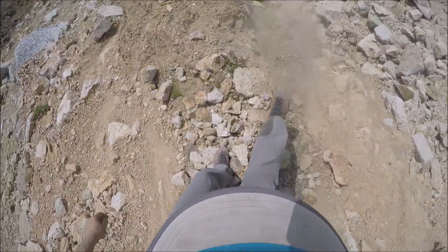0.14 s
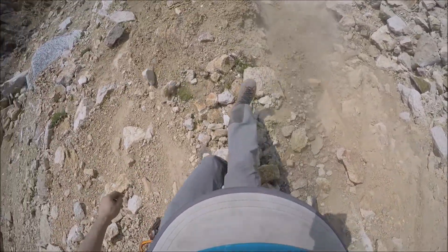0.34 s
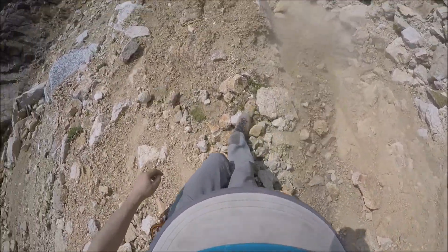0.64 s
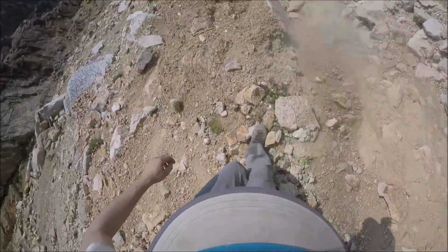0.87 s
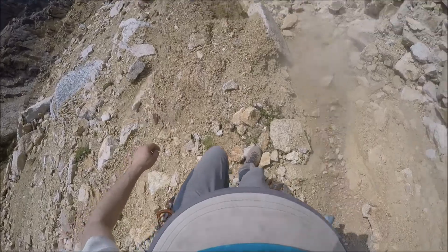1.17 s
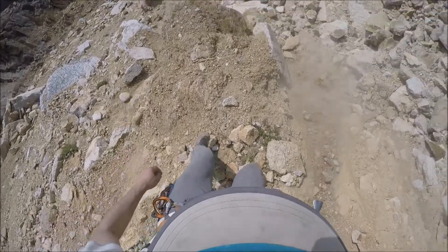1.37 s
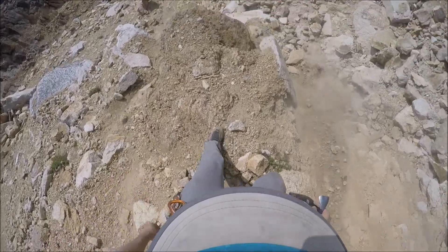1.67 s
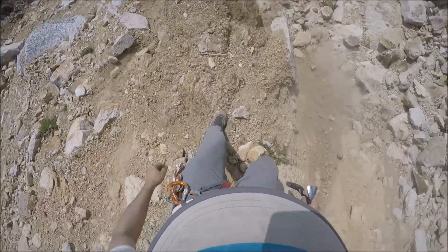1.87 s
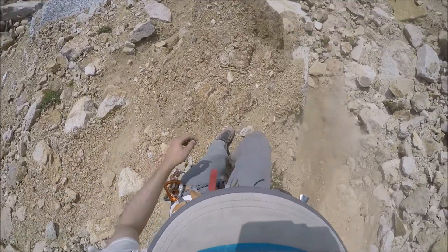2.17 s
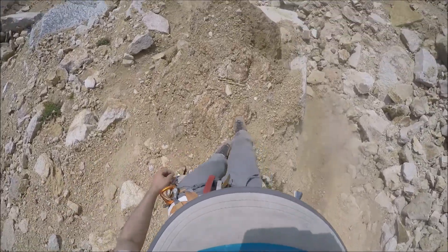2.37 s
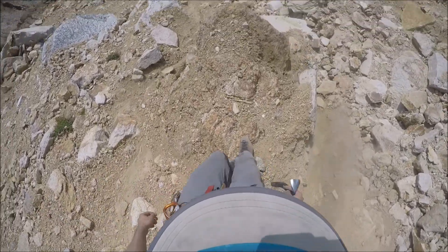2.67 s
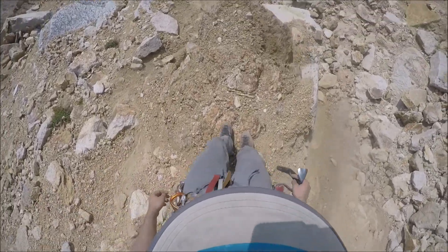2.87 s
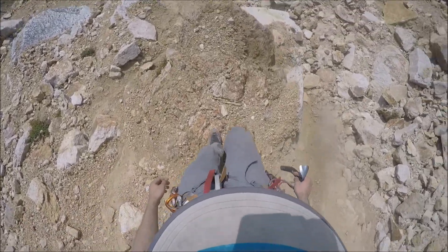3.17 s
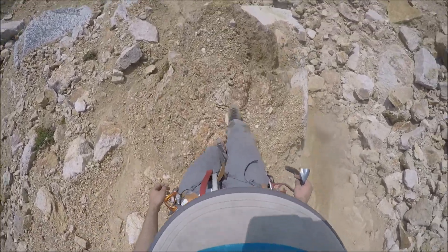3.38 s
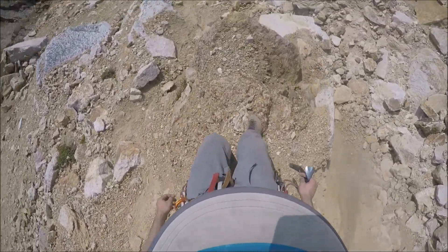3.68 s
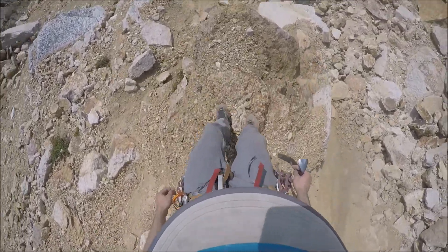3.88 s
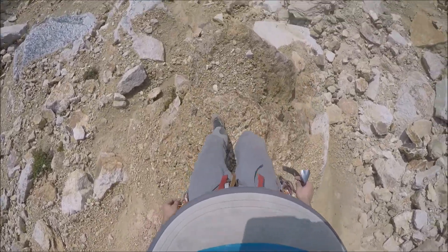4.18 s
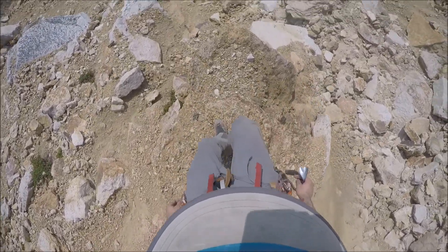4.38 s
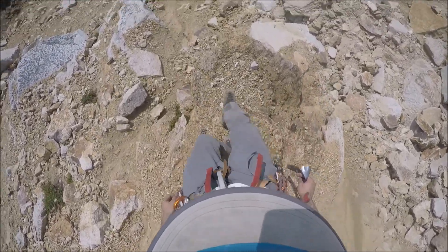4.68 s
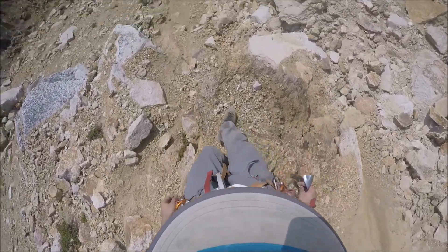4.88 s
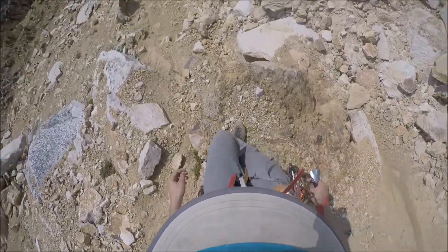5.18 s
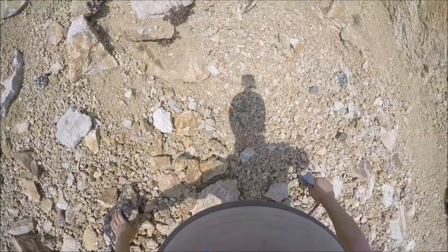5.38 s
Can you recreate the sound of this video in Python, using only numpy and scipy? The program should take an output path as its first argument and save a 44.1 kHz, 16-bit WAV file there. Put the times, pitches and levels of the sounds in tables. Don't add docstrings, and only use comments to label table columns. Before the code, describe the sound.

Outdoors on a dry slope of loose stones, heard from a body-worn camera in a closed case. A dense clatter of pebbles and hissing gravel opens loudly, thins over two seconds, and fades to sparse ticks and a distant trickle. Boot knocks, deep jolts and wind rumble keep bumping the housing. At the very end the hiss drops for a quieter spot.

```python
import sys
import numpy as np
from scipy import signal
from scipy.fft import rfft, irfft
from scipy.io import wavfile
from scipy.ndimage import uniform_filter1d

SR = 44100
rng = np.random.default_rng(int(sys.argv[2]) if len(sys.argv) > 2 else 0)


def output_pcm(signal):
    pcm = np.clip(np.atleast_2d(signal).T, -1, 1) * 32767
    wavfile.write(sys.argv[1], SR, np.round(pcm).astype(np.int16))


def gain_from_decibels(decibels):
    exponent = np.asarray(decibels, float) / 20
    return 10 ** exponent


N = 244302


def rms_one(x):
    return x / np.sqrt(np.mean(x ** 2) + 1e-20)


def in_time(rows):
    s, level = np.transpose(rows)
    return np.interp(np.arange(N) / SR, s, level)


def at_hz(points, hz):
    table_hz, db = np.transpose(points)
    return np.interp(np.log(hz), np.log(table_hz), db)


def drift(rate_hz):
    r = np.exp(-40 * np.pi * rate_hz / SR)
    noise = rng.standard_normal(N // 20 + 2002)
    slow = signal.lfilter([1], [1, -2 * r, r * r], noise)[2000:]
    return np.interp(np.arange(N) / 20, np.arange(len(slow)), rms_one(slow))


def coloured(spectrum):
    hz = np.maximum(np.arange(N // 2 + 1) * SR / N, 1)
    return rms_one(irfft(rfft(rng.standard_normal(N)) * gain_from_decibels(at_hz(spectrum, hz)), N))


def resonate(x, hz, r):
    section = [1, 0, -1, 1, -2 * r * np.cos(2 * np.pi * hz / SR), r * r]
    return signal.sosfilt([section, section], x)


def grains(spectrum, per_s, spread_db, cycles, clump_db, clump_rate, count=20):
    sizes = gain_from_decibels(spread_db * np.minimum(rng.exponential(1, N), 4)) * rng.choice([-1, 1], N)
    born = rng.random(N) < per_s * gain_from_decibels(clump_db * drift(clump_rate)) / SR
    dealt = rng.integers(0, count, N)
    out = np.zeros(N)
    top_hz = min(spectrum[-1][0], 0.36 * SR)
    for k, hz in enumerate(np.geomspace(spectrum[0][0], top_hz, count)):
        clicks = sizes * born * (dealt == k) + 1e-18
        ring = resonate(clicks, hz, gain_from_decibels(-60 * hz / (cycles * SR)))
        out += rms_one(ring) * gain_from_decibels(at_hz(spectrum, hz)) * np.sqrt(hz)
    return rms_one(out)


def swells(rows, rise_db_per_s, rest_db):
    t = np.arange(0, N + 32, 32) / SR
    power = np.zeros(len(t))
    for s, db, fade in rows:
        away_db = np.where(t < s, rise_db_per_s * (s - t), abs(fade) * (t - s))
        power += gain_from_decibels(2 * (db - away_db))
    return 10 * np.log10(np.interp(np.arange(N) / SR, t, power) + gain_from_decibels(2 * rest_db))


def lay(out, start_s, burst):
    at = round(start_s * SR)
    out[at:at + len(burst)] += burst


def quiet_spot():
    start_s, level_db = 5.414, -9
    return gain_from_decibels(level_db * (np.arange(N) / SR > start_s))


# (pitch_hz, level_db per Hz)
DUST = [(180, -45), (300, -5), (1020, -6.5), (1610, -10.5), (2970, 1), (4720, -13), (5210, 3),
        (5850, -12.5), (6670, -1.5), (12300, -20), (15500, -18)]
# (pitch_hz, level_db per Hz)
SPARKS = [(6700, -10), (9500, -4), (15500, 8)]


def fine_dust(gravel_db):
    sparks = grains(SPARKS, per_s=1500, spread_db=5.5, cycles=9.7, clump_db=0.0, clump_rate=22, count=8)
    dust_level = gain_from_decibels(-54.5 + 0.7 * (gravel_db + 43.5))
    still_air = gain_from_decibels(-64)
    hiss = (dust_level + still_air) * gain_from_decibels(1.36 * drift(28)) * coloured(DUST)
    return hiss + gain_from_decibels(gravel_db - 23.0) * sparks


# (time_s, level_db)
SLIDE = [(0.0, -44.5), (0.25, -41.5), (0.63, -45), (1.3, -47.5), (1.48, -47), (1.67, -47), (2.05, -52),
         (2.29, -51.5), (2.42, -54), (3.91, -62), (4.68, -60), (5.24, -65.5), (5.3, -61.5)]
# (pitch_hz, level_db per Hz)
GRAVEL = [(590, -50), (1000, -1.5), (1530, -24), (1690, 3.5), (2340, 1.5), (2740, -2), (3740, 0.5),
          (6400, -9.5), (7690, -36), (10700, -52), (15500, -54)]
# (pitch_hz, level_db per Hz)
COARSE = [(250, 16.5), (500, -7.5), (900, 6.5), (1400, 0.5), (2200, -35)]
# (middle_s, level_db, length_s, fine_share from 0 to 1)
SCRAPES = [
    (0.0069, -50, 0.0049, .1),
    (3.685, -60, 0.026, 0.68),
    (4.16, -57, 0.017, 0.27),
    (4.341, -54, 0.0067, 0.091),
    (4.985, -60, 0.017, 0.6),
    (5.03, -60, 0.04, 0.65),
    (2.635, -59, 0.013, 0.9),
    (2.25, -59, 0.0087, 0.9),
    (1.81, -54.5, 0.025, 0.97),
]
# (start_s, level_db, fade_db_per_s)
ROLLS = [
    (0.0, -54, -2),
    (.43, -55, 11),
    (1.6, -50.5, 11.5),
    (2.38, -61, 62),
    (3.05, -55, 58.5),
    (3.73, -56, 130.5),
    (5.2, -61.5, 9),
    (5.4, -66, 22),
]


def running_gravel():
    t, gravel_db = np.arange(N) / SR, in_time(SLIDE)
    gravel = grains(GRAVEL, per_s=3500, spread_db=4.2, cycles=4.5, clump_db=2.6, clump_rate=70)
    ticks = grains(GRAVEL[1:-3], per_s=700, spread_db=2.0, cycles=3.5, clump_db=4.5, clump_rate=45, count=12)
    ticks_db = -1.0 + 0.23 * (gravel_db + 43)
    coarse = grains(COARSE, per_s=1500, spread_db=3.0, cycles=3.04, clump_db=3.5, clump_rate=25, count=10)
    scrape, fine_scrape = np.zeros(N), np.zeros(N)
    for s, db, length_s, fine_share in SCRAPES:
        stroke = gain_from_decibels(db) * np.exp(-((t - s) / length_s) ** 2)
        scrape += stroke
        fine_scrape += fine_share * stroke
    rolling = gain_from_decibels(swells(ROLLS, rise_db_per_s=43, rest_db=-82) - 5) + scrape
    sliding = gain_from_decibels(gravel_db - 4) * (gravel + gain_from_decibels(ticks_db) * ticks) + fine_scrape * gravel
    return quiet_spot() * (sliding + fine_dust(gravel_db)) + rolling * coarse


# (time_s, level_db)
WIND = [(0.0, -54), (0.43, -55), (0.66, -50), (0.77, -53), (1.76, -47.5), (2.02, -55.5), (2.75, -57.5),
        (3.1, -47.5), (3.33, -52), (3.61, -54), (3.76, -62), (4.21, -51), (4.52, -60.5), (4.64, -51),
        (4.91, -52.5), (5.18, -48), (5.48, -58.5), (5.54, -59)]
# (start_s, level_db, fade_db_per_s)
PUSHES = [(.03, -37.5, 40), (.43, -33, 48), (.71, -35, 5.5), (1.39, -41, 62), (1.53, -40, 49),
          (1.74, -23, 150), (1.87, -25.5, 248), (2.0, -38, 58), (2.31, -41, 22), (2.56, -33.5, 199),
          (2.71, -35.5, 116), (2.87, -37.5, 77), (3.1, -29, 48), (3.5, -37, 52), (3.69, -27, 130),
          (3.78, -35, 112), (3.95, -40.5, 90), (4.24, -36, 60), (4.35, -26, 162), (4.6, -38.5, 24),
          (4.81, -36, 77), (5.0, -28.5, 110), (5.18, -31.5, 250), (5.29, -37.5, 300), (5.4, -37, 202)]
# (pitch_hz, level_db per Hz)
RUMBLE = [(7.1, -66), (12, 8), (27, 1.5), (57, -1.5), (71, -5), (130, -25.5), (170, -53), (290, -120)]
# (pitch_hz, level_db per Hz)
UPPER_RUMBLE = [(70, 1), (110, 1.5), (160, -3.5), (250, -12), (500, -22), (900, -36.5), (3000, -60)]


def rumble():
    low = coloured(RUMBLE)
    low = rms_one(low / uniform_filter1d(low ** 2, size=2600) ** 0.8)
    wind_db = in_time(WIND)
    sway_db = -44 + 0.17 * (wind_db + 48)
    shake_db = swells(PUSHES, rise_db_per_s=177, rest_db=sway_db)
    upper_db = wind_db + 3.0 + 2.07 * drift(20.6)
    return gain_from_decibels(shake_db + 1.0) * low + gain_from_decibels(upper_db) * coloured(UPPER_RUMBLE)


def microphone_hiss():
    return gain_from_decibels(-67.5) * quiet_spot() * rng.standard_normal(N)


def clacks(hits):
    out, t = np.zeros(N + 2048), np.arange(2048) / SR
    contact = 1 - np.exp(-(t / 0.00037) ** 2)
    for s, db, hz, body_db, edge_db, t60_s in hits:
        noise = rng.standard_normal(2048)
        above, below = 1.0 + 0.358 * rng.random(), 0.55 + 0.309 * rng.random()
        dying = -60 * t / t60_s
        ring = np.sin(2 * np.pi * hz * t) * gain_from_decibels(dying)
        ring += 0.22 * np.sin(2 * np.pi * hz * above * t) * gain_from_decibels(0.6 * dying)
        ring += 0.35 * np.sin(2 * np.pi * hz * below * t) * gain_from_decibels(0.62 * dying)
        crunch = 0.65 * rms_one(resonate(noise, 1.05 * hz, 0.82)) * gain_from_decibels(0.75 * dying)
        body = rms_one(resonate(noise, 460, 0.873)) * gain_from_decibels(body_db - 2.5 - 60 * t / 0.074)
        edge = rms_one(resonate(noise, 4670, 0.61)) * gain_from_decibels(edge_db + 13.5 - 60 * t / 0.014)
        lay(out, s, gain_from_decibels(db - 4.5) * contact * (ring + crunch + body + edge))
    return out[:N]


def patter(rows, gain_db, t60_s, r):
    out, t = np.zeros(N + 1024), np.arange(1024) / SR
    shape = (1 - np.exp(-(t / 0.00055) ** 2)) * gain_from_decibels(gain_db - 60 * t / t60_s)
    for s, db, hz in rows:
        breath = rms_one(resonate(rng.standard_normal(1024), hz, r))
        lay(out, s, gain_from_decibels(db) * shape * (np.sin(2 * np.pi * hz * t) + 0.85 * breath))
    return out[:N]


# (start_s, peak_db, pitch_hz, body_db against the peak)
THUMPS = [(.005, -26.5, 1190, -23), (0.223, -31.5, 1000, -12), (0.1259, -32, 1820, -3),
          (.5127, -39, 2360, 2.5), (0.5708, -38, 2420, 2), (.6529, -38.5, 2330, 1),
          (0.9715, -29.5, 2360, -15), (1.024, -31, 2400, -8.5), (1.3304, -29.5, 2360, -3),
          (1.5578, -36, 2420, 1.5), (1.8486, -24, 1160, -15), (1.9969, -42.5, 3380, 1.5),
          (2.0045, -34.5, 2640, -5.5), (2.0522, -36, 920, -13), (2.0812, -35, 1098, -8),
          (2.2134, -25, 1075, -10.5), (2.4019, -32, 1133, -4), (2.4255, -26.5, 2270, -8),
          (2.6736, -42, 910, -13), (2.7277, -36, 2530, -5), (2.8628, -41, 1180, 0.5),
          (3.161, -36, 1030, -20), (3.2096, -44.5, 2530, 1.5), (3.88, -38.5, 2660, -9),
          (5.5242, -46, 2370, -2.5)]


def thumps():
    return clacks([(s, db, hz, body_db, -17, 0.02) for s, db, hz, body_db in THUMPS])


# (start_s, peak_db, pitch_hz)
PEBBLES = [(0.025, -30, 2360), (0.1186, -22, 2340), (0.1424, -24.5, 2360), (0.1964, -25.5, 2310),
           (0.2584, -31, 3620), (0.4654, -34, 2870), (0.6794, -29, 2360), (0.836, -36, 2360),
           (0.986, -34, 2390), (1.1074, -33, 2280), (1.2454, -36, 3820), (1.304, -34, 3400),
           (1.4364, -32, 2540), (1.5704, -34.5, 2330), (1.7204, -32, 2320), (1.8492, -25, 2480),
           (1.9604, -36.5, 2380), (2.1366, -29.5, 3740), (2.1494, -39, 1810), (2.2544, -35, 2350),
           (2.3354, -36, 2200), (2.5052, -43, 3130), (2.6164, -40, 3130), (2.636, -40, 2380),
           (2.7277, -36, 3260), (2.7324, -36, 2380), (2.8524, -38.5, 2370), (2.8623, -32, 1800),
           (2.9183, -41, 2560), (3.1667, -37, 2530), (3.1934, -46, 2550), (3.3677, -47.5, 2370),
           (3.3797, -45, 2680), (3.3874, -45, 1850), (3.4004, -41, 3630), (3.4171, -42, 2840),
           (3.4484, -46, 2330), (3.48, -42, 3770), (3.692, -44, 1990), (3.7914, -45, 2920),
           (4.2744, -42, 2720), (4.2864, -49, 3000), (4.3584, -48, 2770), (4.513, -44, 2960),
           (4.6084, -42, 3000), (4.6234, -42, 3340), (4.6503, -46, 2580), (4.8005, -44, 2840),
           (4.8424, -48.5, 3750), (5.3642, -48, 2230)]


def pebbles():
    return patter(PEBBLES, gain_db=-6.5, t60_s=0.017, r=0.83)


# (start_s, peak_db, pitch_hz, t60_s to fade by 60 dB)
RINGS = [(.0318, -35, 3680, 0.074), (0.1248, -22, 2330, 0.043), (.1805, -36.5, 1195, 0.04),
         (0.1849, -35.5, 2360, 0.06), (0.3139, -20.5, 2360, 0.019), (.3466, -37.5, 3600, 0.046),
         (0.356, -33, 2264, 0.1), (0.427, -31, 2370, 0.017), (0.5304, -27.5, 2250, .018),
         (0.7856, -35.5, 1220, 0.032), (0.794, -35, 2370, 0.014), (0.8493, -27, 1680, .02),
         (1.0593, -27.5, 3600, 0.013), (1.095, -29, 3750, 0.03), (1.2102, -35, 1076, 0.044),
         (1.208, -38.5, 900, 0.045), (1.3625, -22.5, 2260, 0.014), (1.4221, -22, 2580, 0.015),
         (1.727, -25.5, 3050, 0.013), (2.1326, -31, 1944, 0.035), (2.142, -34, 1735, 0.054),
         (2.2684, -27, 2360, 0.0091), (2.2724, -26.5, 1803, 0.039), (2.2824, -28, 2340, 0.016),
         (2.4586, -39.5, 3172, 0.028), (2.7577, -30.5, 2300, 0.022), (4.4684, -46, 2960, 0.044),
         (4.7346, -40, 2930, 0.025), (4.7727, -36, 2930, 0.02)]


def rings():
    return clacks([(s, db, hz, -37, -24, t60_s) for s, db, hz, t60_s in RINGS])


# (start_s, peak_db, pitch_hz)
GRIT = [(0.0474, -40, 4860), (0.1092, -30, 5410), (0.2084, -34, 4730), (0.2309, -37, 5740),
        (0.2428, -35, 4960), (0.2584, -34, 4930), (0.2644, -34, 4520), (0.2982, -36, 5020),
        (0.3994, -35, 4500), (0.6719, -35, 4920), (0.8649, -40, 5080), (0.9273, -35, 5730),
        (0.9464, -41, 4520), (1.1054, -36, 5760), (1.1124, -34, 5030), (1.1468, -39, 5140),
        (1.1604, -40, 5500), (1.2446, -39, 4500), (1.3444, -43.5, 5860), (1.3734, -44, 6340),
        (1.4631, -35, 6290), (1.5814, -39, 5770), (1.8254, -42.5, 6580), (1.8961, -36, 5730),
        (1.9594, -45.5, 5760), (2.3174, -38, 4950), (2.352, -41, 6090), (2.6224, -48, 6700),
        (2.8853, -50, 5350), (2.9417, -46, 5560), (2.9781, -50, 6700), (3.0334, -49, 5890),
        (3.0604, -49, 6600), (3.458, -40, 5030), (3.5009, -43, 5820), (4.3201, -53, 5460),
        (4.4493, -51, 6420), (4.593, -49, 6590), (4.6024, -48.5, 6540), (4.7217, -50, 4990),
        (4.9844, -55, 5340)]


def grit():
    return patter(GRIT, gain_db=0, t60_s=0.012, r=0.7)


# (start_s, peak_db, pitch_hz)
TICKS = [(0.216, -53, 9380), (0.2986, -41, 9130), (0.551, -45, 9960), (0.8104, -45, 9220),
         (1.1053, -45, 9920), (1.4221, -49, 9290), (1.5722, -47, 9030), (1.7114, -54, 9100),
         (1.9972, -49, 9100), (2.0978, -49, 8870), (2.3315, -52, 8940), (2.4392, -59, 9380),
         (2.7535, -51, 9000), (5.152, -45.5, 8170), (.110, -44, 9300), (1.1155, -43, 9300),
         (2.048, -51, 9300), (2.1205, -47, 9300), (2.1425, -51, 9300), (2.371, -52, 9300),
         (2.629, -54, 9300), (3.5055, -55, 9300), (3.945, -56, 9300), (4.319, -50, 9300),
         (4.335, -53, 9300), (4.682, -52, 9300)]


def ticks_close():
    out, t = np.zeros(N + 1024), np.arange(1024) / SR
    for s, db, hz in TICKS:
        burst = rms_one(resonate(rng.standard_normal(1024), 0.86 * hz, 0.53))
        lay(out, s, gain_from_decibels(db - 1.5 - 60 * t / 0.0097) * burst)
    return out[:N]


# (start_s, peak_db, pitch_hz, t60_s to fade by 60 dB)
KNOCKS = [(0.12, -13, 650, 0.011), (0.61, -37, 348, 0.018), (1.02, -24, 520, 0.0078),
          (1.338, -28.5, 380, 0.01), (1.847, -31, 584, 0.017), (2.05, -37, 453, 0.0097),
          (2.212, -27, 327, 0.019), (2.2115, -31, 790, 0.018), (2.4, -38, 400, 0.034),
          (2.85, -34.5, 470, 0.013), (3.148, -39, 310, 0.029), (4.1, -48, 283, 0.015),
          (4.345, -42, 270, 0.02), (4.344, -44, 690, 0.012), (1.008, -35, 1030, 0.018)]


def knocks():
    out, t = np.zeros(N + 4096), np.arange(4096) / SR
    onset = 1 - np.exp(-t / 0.00069)
    for s, db, hz, t60_s in KNOCKS:
        ring = np.sin(2 * np.pi * hz * t)
        ring += 0.28 * np.sin(2.8 * np.pi * hz * t)
        ring += 0.086 * np.sin(1.1 * np.pi * hz * t)
        lay(out, s + 0.0015, gain_from_decibels(db + 0.5 - 60 * t / t60_s) * onset * ring)
    return out[:N]


# (start_s, peak_db, pitch_hz)
CHIPS = [(.2309, -43, 3600), (0.551, -35, 3400), (0.7374, -47, 2380), (0.8735, -35, 2310),
         (.8999, -47, 2370), (1.1129, -32.5, 2360), (1.2346, -38.5, 3310), (1.2936, -28.5, 3200),
         (1.392, -34, 1530), (1.4454, -34.5, 2480), (1.5322, -29.5, 2710), (1.6067, -34, 3000),
         (1.7946, -36, 3380), (1.8974, -39, 2490), (1.9308, -38, 2360), (2.1805, -36.5, 2460),
         (2.3236, -38.5, 3810), (2.329, -41, 3210), (2.3303, -31, 1565), (2.597, -32.5, 1296),
         (2.5981, -36, 2310), (2.673, -39, 2610), (2.827, -34.5, 2890), (2.9607, -40, 3130),
         (2.9845, -41, 3160), (3.175, -32, 2540), (3.226, -41, 2630), (3.46, -46, 2360),
         (3.7817, -49, 2660), (4.5496, -44.5, 2820), (4.874, -44.5, 2680)]


def chips():
    return clacks([(s, db, hz, -22, -9.5 - 0.46 * (db + 39.0), 0.026) for s, db, hz in CHIPS])


# (middle_s, peak_db, pitch_hz, length_cycles)
JOLTS = [(.42, -48, 38, 1.5), (1.745, -23, 61.3, 3.7), (1.857, -18, 97, 2.3), (1.852, -29.5, 181, 1.9),
         (2.421, -30.5, 84, 3), (2.56, -23, 39.4, 1.2), (2.712, -31.5, 39, 1.6), (3.09, -23.5, 56, 1.3),
         (3.134, -24, 31.7, 4.9), (3.659, -16.5, 44, 1.6), (4.24, -19, 25.2, 6.2), (4.348, -36.5, 192, 1.8),
         (4.351, -19, 94.5, 2.8), (4.99, -24, 38.3, 1.8), (5.283, -31, 39.3, 2)]


def jolts():
    t, out = np.arange(N) / SR, np.zeros(N)
    for s, db, hz, cycles in JOLTS:
        swell = np.exp(-((t - s) * hz * 4.26 / cycles) ** 2)
        out += gain_from_decibels(db) * swell * np.sin(2 * np.pi * hz * (t - s) + 1.94)
    return out


# (start_s, peak_db, pitch_hz)
LUMPS = [(0.515, -41, 1520), (0.57, -38, 1570), (0.69, -36, 1080), (0.741, -40, 1510), (0.878, -42, 1210),
         (1.059, -41, 1190), (1.339, -35, 980), (1.394, -44, 1080), (1.641, -41, 1150), (2.131, -37, 1550),
         (2.28, -38, 1210), (2.337, -49, 1030), (2.373, -42, 1090), (2.562, -49, 635), (2.605, -45, 1080),
         (2.733, -45, 1080), (2.757, -40, 1260), (2.862, -43, 1580), (3.055, -54, 1010), (3.122, -48, 600),
         (3.21, -46, 1080), (3.879, -47, 1000), (4.344, -44, 1170), (4.98, -48.5, 608), (5.524, -52, 1450)]


def lumps():
    return patter(LUMPS, gain_db=-7.5, t60_s=0.027, r=0.905)


# (pitch_hz, width_hz, gain_db)
HOUSING = [(1196, 170, 4.5), (1538, 102, 5), (1645, 103, -10), (1830, 130, 1.5), (2130, 57, 1),
           (2360, 126, 6), (2960, 41, 1), (1306, 130, -0.5), (3600, 510, 2.5), (4310, 190, -3.5),
           (4710, 144, -7.5), (5184, 350, -5.5), (6480, 300, 1.5), (7650, 1180, -11.5), (9220, 340, 4),
           (10840, 350, 3), (11930, 700, 5), (14400, 640, -13)]


def housing(x):
    for hz, width_hz, db in HOUSING:
        w, a, g = 2 * np.pi * hz / SR, np.pi * width_hz / SR, gain_from_decibels(db / 2)
        x = signal.lfilter([1 + a * g, -2 * np.cos(w), 1 - a * g], [1 + a / g, -2 * np.cos(w), 1 - a / g], x)
    return x


def scene():
    gravel = running_gravel()
    shake = 0.19 * np.tanh((rumble() + jolts()) / 0.19)
    struck = thumps() + pebbles() + rings() + grit() + knocks() + chips() + lumps()
    stone_top = signal.butter(6, 6660, fs=SR, output="sos")
    struck = signal.sosfilt(stone_top, struck)
    return (housing(gravel + struck) + ticks_close() + shake + microphone_hiss())[None]


def lost_treble(x, hz):
    lines, bin_hz = rfft(x), np.arange(x.shape[1] // 2 + 1) * SR / x.shape[1]
    power = np.abs(lines) ** 2
    weak = uniform_filter1d(power, size=9) < uniform_filter1d(power, size=60)
    share = np.where((bin_hz > hz) | weak, 1, -0.4) * (bin_hz > 700)
    return irfft(lines * share, x.shape[1])


# (middle_s, lowest_hz, loss_db)
DROPOUTS = [
    (1.212, 7000, -20),
    (1.555, 7500, -14),
    (2.087, 5000, -18),
    (2.175, 7500, -10),
    (2.32, 7000, -40),
    (2.426, 4200, -40),
    (3.025, 4200, -14),
    (4.176, 5500, -30),
    (4.502, 6500, -30),
]


def drop_treble(dry):
    out = dry.copy()
    for s, hz, loss_db in DROPOUTS:
        part = slice(round((s - 0.04) * SR), round((s + 0.04) * SR))
        treble = lost_treble(dry[:, part], hz)
        away_s = np.abs(np.arange(treble.shape[1]) / SR - 0.04)
        fade = np.clip((0.011 - away_s) / 0.005, 0, 1)
        out[:, part] -= (1 - gain_from_decibels(loss_db)) * treble * fade
    return out


# (middle_s, lowest_hz)
TOP_DROPOUTS = [
    (3.615, 13300),
    (3.745, 13000),
    (4.158, 13600),
    (4.2, 13800),
    (4.24, 13400),
    (4.78, 14300),
    (5.0, 13500),
]


def drop_top(x):
    for s, hz in TOP_DROPOUTS:
        part = slice(round((s - 0.03) * SR), round((s + 0.03) * SR))
        top = signal.sosfiltfilt(signal.butter(8, hz, "high", fs=SR, output="sos"), x[:, part])
        x[:, part] -= top * np.clip(3 - np.abs(np.linspace(-6, 6, top.shape[1])), 0, 0.9)
    return x


def band_limit(x):
    return signal.sosfilt(signal.butter(12, 15630, fs=SR, output="sos"), x)


def record(dry):
    top_cut = signal.ellip(14, 0.3, 60, 15340, fs=SR, output="sos")
    mix = drop_top(drop_treble(signal.sosfilt(top_cut, dry)))
    return band_limit(mix)


dry = scene()
out = record(dry)
output_pcm(out)
```